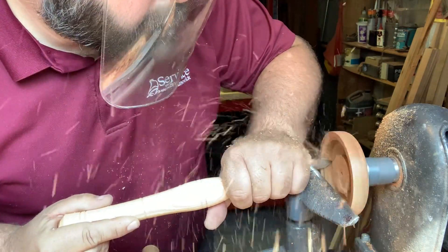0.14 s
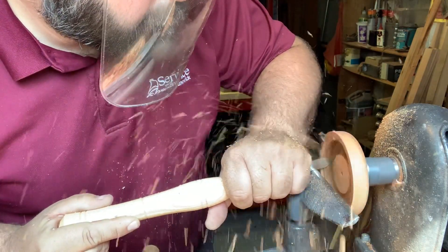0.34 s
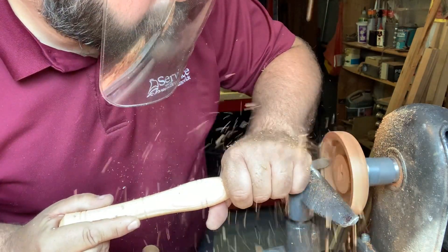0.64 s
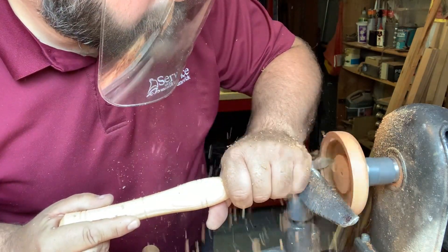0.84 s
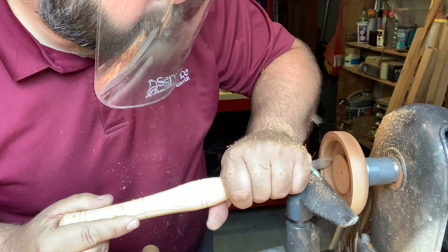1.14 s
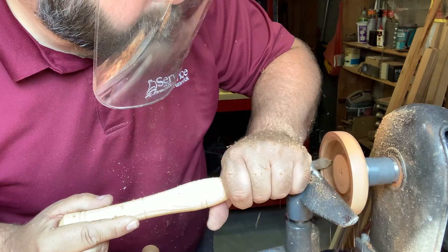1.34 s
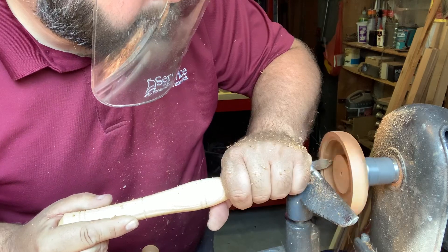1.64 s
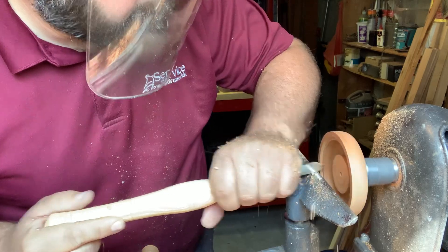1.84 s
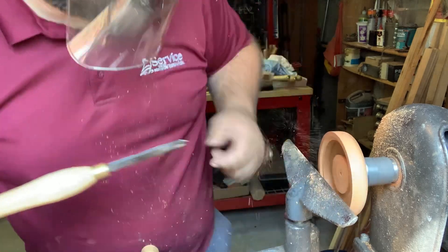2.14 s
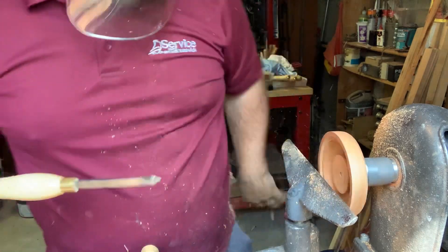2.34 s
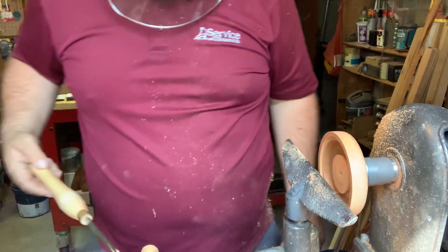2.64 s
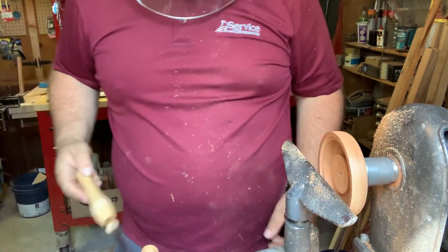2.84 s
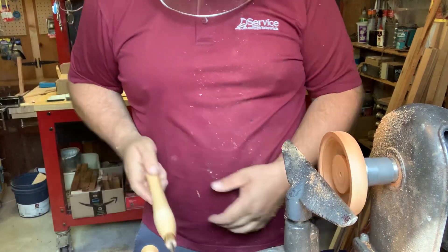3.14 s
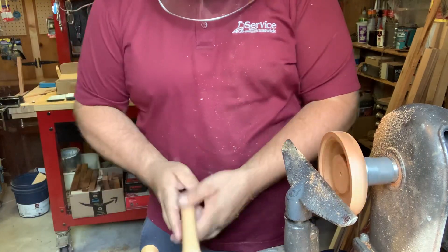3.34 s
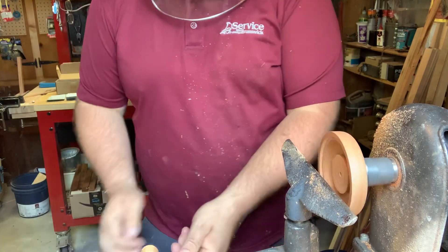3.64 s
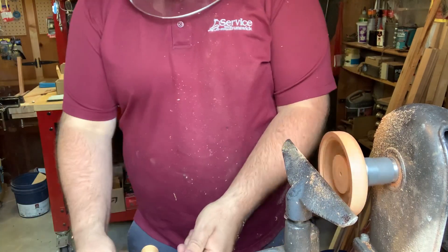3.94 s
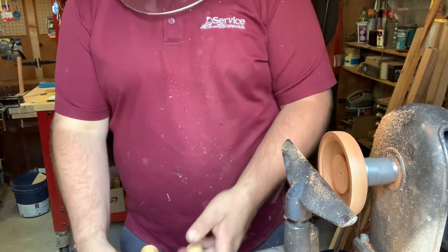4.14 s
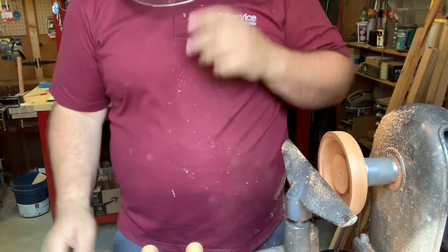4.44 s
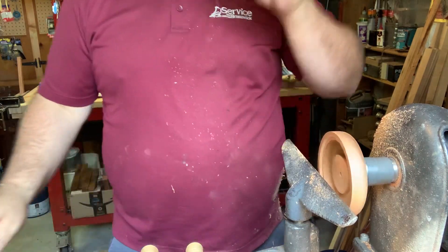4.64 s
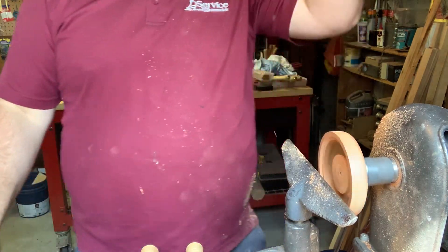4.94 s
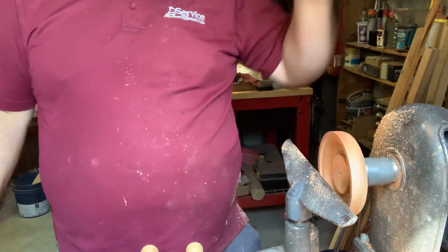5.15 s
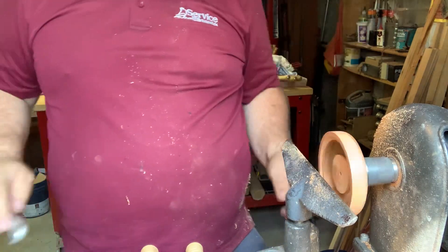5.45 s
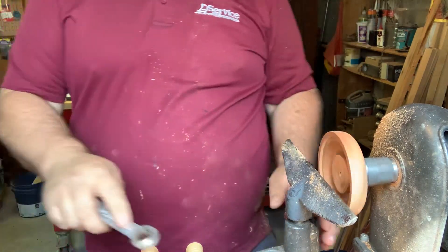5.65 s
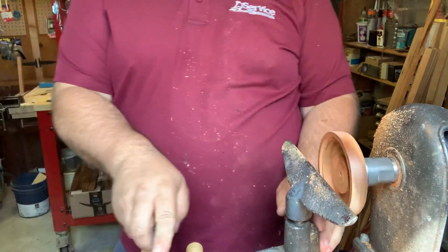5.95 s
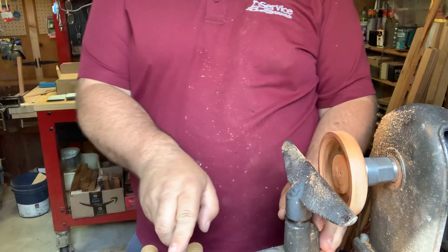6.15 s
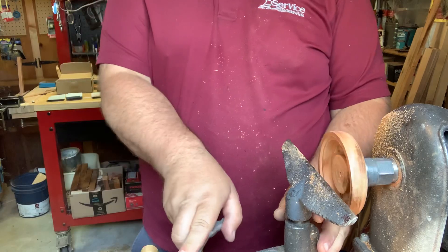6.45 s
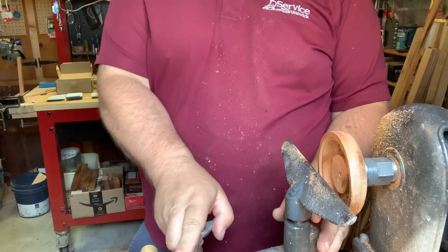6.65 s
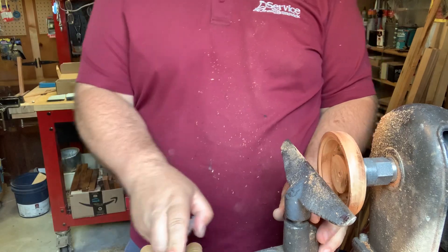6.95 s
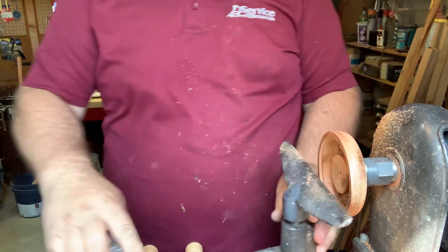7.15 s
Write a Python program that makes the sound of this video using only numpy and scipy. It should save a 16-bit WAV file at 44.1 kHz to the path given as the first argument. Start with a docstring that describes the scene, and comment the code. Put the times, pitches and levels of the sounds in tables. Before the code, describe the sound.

Close stereo pickup of a wood lathe in a small cluttered room. Loud scraping, crackling chips and a high whine pulse quickly with the rotation, then break into a short sagging squeal and chirps. The cut lightens and stops before two seconds. Steady motor hum and airy fan roar continue, slightly growing, broken by quiet handling ticks, a ringing double clink of steel and a low thud.

```python
"""Wood lathe in a small workshop

Motor harmonics hum over shaped noise: housing rumble, fan roar, air hiss and thin headstock whines.
A gouge cuts the spinning blank: snapping fibres scrape twice a turn and tear, friction sustains whining
tones and squeals; the cut eases off and the gouge is lifted away.
Short damped noises tick; later steel tools, as decaying modes, clink as they are put down and picked up."""
import sys
import numpy as np
from scipy import signal
from scipy.fft import rfft, irfft
from scipy.io import wavfile
from scipy.ndimage import uniform_filter1d

SR = 44100
rng = np.random.default_rng(int(sys.argv[2]) if len(sys.argv) > 2 else 0)


def transcribe(signal):
    """Save signal, clipped to [-1, 1], as a 16-bit WAV file at the path in sys.argv[1]."""
    frames = np.atleast_2d(signal).T
    limited = np.clip(frames, -1, 1)
    pcm = np.round(limited * 32767).astype(np.int16)
    wavfile.write(sys.argv[1], SR, pcm)


N = 321916
T, HZ = np.arange(N) / SR, np.fft.rfftfreq(N, 1 / SR)
MOTOR_HZ, SPINDLE_HZ = 353.6, 22.1
SIDE = np.array([[.5], [-.5]])  # left, right share of a left-right difference


def amp(db):
    """Amplitude ratio of a level in dB."""
    return 10 ** (np.asarray(db) / 20)


def unit_rms(x):
    """Scales to rms 1."""
    return x / np.sqrt(np.mean(x ** 2) + 1e-20)


def spectrum_curve(points, hz=HZ):
    """Joins (Hz, value) points by straight lines over log frequency."""
    point_hz, value = np.transpose(points)
    return np.interp(np.log(hz + 1), np.log(point_hz + 1), value)


def time_curve(rows):
    """Joins (s, value) points by straight lines."""
    return np.interp(T, *np.transpose(rows))


def bump(s, half_s):
    """Smooth rise and fall of height 1 around a moment; 1/e at half_s."""
    return np.exp(-((T - s) / half_s) ** 2)


def resonance_db(modes):
    """dB curve of a set of resonances."""
    return sum(db / (1 + (2 * (HZ - hz) / width) ** 2) for hz, width, db in modes)


def colour(x, db):
    """Filters by a dB curve, without phase shift."""
    return irfft(rfft(x) * amp(db), N)


def unit_band(x, band_hz):
    """Scales a stereo pair so that its middle has rms 1 within a band."""
    low_hz, high_hz = band_hz
    middle = rfft(x.mean(0)) * ((HZ > low_hz) & (HZ < high_hz))
    return x / np.std(irfft(middle, N))


def drift(rate_hz):
    """Slow chance of rms 1, low-passed near rate_hz."""
    noise = rfft(rng.standard_normal(N))
    return unit_rms(irfft(noise / (1 + (HZ / rate_hz) ** 4), N))


def add(mix, s, sound):
    """Adds a sound at a moment, in place."""
    part = mix[round(s * SR):][:len(sound)]
    part += sound[:len(part)]


# decay of the room's reflections: hz, t60_s
ROOM_T60 = [(200, 0.2), (2000, 0.34), (6000, 0.18), (13000, 0.019)]
PORT_LAG_S = 0.00016  # the work is nearer to the left port


def workshop(x, wet_db, lag_s=PORT_LAG_S):
    """Direct sound at two ports plus dense reflections from the machine, shelves and walls."""
    size = SR // 2
    taps = rng.choice([-1., 1.], (2, size)) * (rng.random((2, size)) < .08)
    hz, t, z = signal.stft(taps, SR, nperseg=256)
    decay = amp(-60 * t / spectrum_curve(ROOM_T60, hz)[:, None])
    early = 1 + 2.9 * np.exp(-t / 0.0074)
    tail = signal.istft(z * decay * early * (t > 0), SR, nperseg=256)[1]
    tail /= np.linalg.norm(tail[0])
    wet = signal.fftconvolve(x[None], tail, axes=1)[:, :N]
    late = irfft(rfft(x) * np.exp(-2j * np.pi * HZ * lag_s), N)
    return np.array([x, late]) + amp(wet_db) * wet


def tone(hz, db, pan_db, lead, wander, wander_hz, shiver_db):
    """Friction sustains a mode as a tone whose phase and swing wander."""
    phase = 2 * np.pi * hz * T + wander * drift(wander_hz)
    level_db = db + shiver_db * drift(70) + SIDE * pan_db
    return amp(level_db) * np.sin(phase + SIDE * lead)


def singing(modes, wander_hz):
    """A set of sustained modes whose middle has rms 1."""
    out = sum(tone(*mode, wander_hz, shiver_db=5.0) for mode in modes)
    return out / np.std(out.mean(0))


def struck(modes, t):
    """Free ring of a set of modes after one blow."""
    return sum(amp(db - 60 * t / t60) * np.sin(2 * np.pi * (hz * t + rng.random())) for hz, db, t60 in modes)


def turn_swing(at):
    """Swings between -1 and 1 once a turn, highest at the given point of the turn (0-1)."""
    return np.cos(2 * np.pi * (SPINDLE_HZ * T - at))


# left-right likeness of machine noise: hz, likeness (clipped to -1..1)
LIKENESS_CURVE = [(60, 3.5), (140, 1.5), (300, 0.29), (600, 0.5), (1100, 0.05), (2500, 0.08), (6000, 0.1),
                  (12000, -3.5)]
# lead of the left port: hz, lead_rad
LEAD_CURVE = [(60, 0.13), (200, -0.11), (400, 0.91), (700, 0.83), (1030, 0.29), (1500, 2.14), (3300, 0.47),
              (12000, -1.55)]
# left-right level difference: hz, left_right_db
BALANCE_CURVE = [(60, -7), (110, -3), (200, -4.5), (370, -5), (690, -1), (1260, -3), (2320, 1), (4270, -1),
                 (7860, -3.5), (14400, 3)]


def machine_noise(db):
    """Noise of the given spectrum, as it reaches the two ports from the headstock."""
    a, b = rfft(rng.standard_normal((2, N)))
    same = np.clip(spectrum_curve(LIKENESS_CURVE), -1, 1)
    side = amp(spectrum_curve(BALANCE_CURVE) / 2)
    right = (same * a + np.sqrt(1 - same ** 2) * b) * np.exp(-1j * spectrum_curve(LEAD_CURVE))
    return irfft(np.array([a * side, right / side]) * amp(db), N)


EDDY_DB, EDDY_HZ, EDDY_S = 1.1, 260, 0.13  # rms depth, width, length of an eddy


def churning(x):
    """Eddies in the fan's air lift and lower small patches of its noise."""
    hz, t, z = signal.stft(x, SR, nperseg=1024)
    patches = uniform_filter1d(rng.standard_normal(z.shape[1:]), round(EDDY_HZ / hz[1]), axis=0)
    patches = unit_rms(uniform_filter1d(patches, round(EDDY_S / t[1]), axis=1))
    return signal.istft(z * amp(EDDY_DB * patches), SR, nperseg=1024)[1][:, :N]


# noise spectra of rumble, its hollow middle, fan roar, fan cowl, air hiss, fine treble: hz, db_per_hz
RUMBLE_SPECTRUM = [(20, -53), (33, -33), (48, -20.5), (78, -13), (120, -7.5), (200, -9), (260, -8.5),
                   (315, -16), (400, -6), (500, -17), (700, -18), (900, -25.5), (1500, -79.5)]
HOLLOW_SPECTRUM = [(200, -45), (380, -31), (470, -6.5), (540, 2), (620, -0.5), (760, 1.5), (900, -14.5),
                   (1200, -53), (3000, -100)]
ROAR_SPECTRUM = [(300, -17), (600, -6.5), (900, -3.5), (1050, 0.5), (1300, -4), (1550, -5), (1750, -9.5),
                 (2100, -13.5), (3000, -22), (5000, -65)]
COWL_SPECTRUM = [(700, -38.5), (900, -12.5), (960, 0.5), (1010, -5.5), (1065, 0.5), (1130, -6),
                 (1250, -3.5), (1450, -26), (2000, -56.5), (4000, -100)]
AIR_SPECTRUM = [(800, -14.5), (2000, 3.5), (2700, 4), (3200, 6.5), (3600, 0.5), (4100, 1), (5500, -4.5),
                (6800, -3), (7600, -10), (9000, -37.5), (14500, -49.5)]
TREBLE_SPECTRUM = [(5000, -32.5), (8000, -10.5), (10700, 6.5), (12200, 0), (13200, -12.5), (14500, -15)]
# resonances of the housing: hz, width_hz, lift_db
HOUSING_MODES = [(78, 12, 4), (107.6, 4.3, 6), (154.4, 14, 13), (215.8, 30, 9), (412.6, 11, 3.5),
                 (542.4, 20, 4)]
# depth of the ripple of evenly spaced standing waves: hz, depth_db
STANDING_RIPPLE = [(300, 0.55), (450, 1.8), (600, 7.1), (850, 5.4), (1050, 3.1), (1500, 3.9), (2500, 1.4)]
# thin whines of the headstock: hz, relative_db, left_right_db, left_lead_rad, phase_wander_rad
HEADSTOCK_WHINES = [(1162, -0.5, 1, 0.5, 1.5), (1430, 0, 4, 0.43, 1.2), (1640, -4.5, 3, 1.7, 1.3),
                    (1685, 7, 0, 1.8, 1.5), (1826, 1, 2, 1.7, 1), (2945, -7.5, 8, 0.5, 4),
                    (3280, -6.5, 6.5, 0.3, 4.3)]
# level of the hollow middle of the rumble: time_s, level_db
HOLLOW_LEVEL = [(0, -43), (1.9, -42), (3.2, -44.5), (4.7, -49), (5.1, -40), (7.3, -39.5)]
# level of the fine treble hiss: time_s, level_db
TREBLE_LEVEL = [(0, -75), (4.1, -74), (4.8, -78), (5.5, -88), (7.3, -89)]
# how openly the fan is heard past the moving turner: time_s, openness_db
FAN_OPENNESS = [(0, 3.5), (1.7, -0.5), (2.6, 1), (3.4, 2.5), (3.75, 4), (4.1, 6), (4.3, 2), (5.0, 1.5),
                (5.6, -2.5), (6.1, 2), (7.3, 3.5)]
# brief dips and swells of hum and rumble: time_s, half_length_s, hum_db, rumble_db
MACHINE_SURGES = [(1.102, 0.32, -2.5, -2), (6.64, 0.41, -2.5, 2)]
STANDING_HZ = 67.75  # spacing of the standing waves
RUMBLE_START_DB, RUMBLE_GROWTH_DB_PER_S, RUMBLE_WAVER_DB = -30, 0.5131, 0.6
ROAR_DB, ROAR_GROWTH_DB_PER_S = -44.5, 0.27
# level at openness 0, dB gained per dB of openness
COWL_DB, COWL_PER_OPEN = -45.5, 1.42
AIR_DB, AIR_PER_OPEN = -58.5, 0.22
HEADSTOCK_DB = -51


def machine():
    """Housing rumble, fan roar that throbs with the spindle and rings its cowl, air hiss and thin whines."""
    open_db = time_curve(FAN_OPENNESS)
    surge_db = sum(db * bump(s, half_s) for s, half_s, _, db in MACHINE_SURGES)
    rumble_gain = amp(RUMBLE_START_DB + RUMBLE_GROWTH_DB_PER_S * T + surge_db + RUMBLE_WAVER_DB * drift(35))
    roar_gain = amp(ROAR_DB + ROAR_GROWTH_DB_PER_S * T)
    cowl_gain = amp(COWL_DB + COWL_PER_OPEN * open_db)
    air_gain = amp(AIR_DB + AIR_PER_OPEN * open_db)
    throb = amp(0.94 * np.sin(2 * np.pi * SPINDLE_HZ * T) + 1.3 * drift(15))

    ripple_db = spectrum_curve(STANDING_RIPPLE) * np.cos(2 * np.pi * HZ / STANDING_HZ)
    housing_db = resonance_db(HOUSING_MODES) + ripple_db
    rumble = machine_noise(spectrum_curve(RUMBLE_SPECTRUM) + housing_db)
    hollow = machine_noise(spectrum_curve(HOLLOW_SPECTRUM) + housing_db)
    roar = churning(machine_noise(spectrum_curve(ROAR_SPECTRUM) + housing_db))
    cowl = machine_noise(spectrum_curve(COWL_SPECTRUM))
    air = churning(machine_noise(spectrum_curve(AIR_SPECTRUM)))
    treble = machine_noise(spectrum_curve(TREBLE_SPECTRUM))
    # levels hold within the given bands (Hz)
    return (rumble_gain * unit_band(rumble, (60, 300))
            + amp(time_curve(HOLLOW_LEVEL)) * unit_band(hollow, (480, 800))
            + roar_gain * throb * unit_band(roar, (850, 1400))
            + cowl_gain * throb * unit_band(cowl, (850, 1400))
            + air_gain * unit_band(air, (3500, 7000))
            + amp(time_curve(TREBLE_LEVEL)) * unit_band(treble, (9000, 15000))
            + amp(HEADSTOCK_DB) * singing(HEADSTOCK_WHINES, wander_hz=4))


# motor hum: harmonic, relative_db, left_right_db, left_lead_rad
HUM_HARMONICS = [(1, -1.5, -2.5, 0.45), (2, -15.5, -0.5, 2.5), (3, -16.5, 4.5, -0.1), (4, -34.5, -5, -0.5)]
HUM_START_DB, HUM_GROWTH_DB_PER_S, HUM_WAVER_DB = -27.5, 0.71, 1.36
# this harmonic comes out with the fan's air: dB gained per dB of openness
WHISTLE_ORDER, WHISTLE_DB, WHISTLE_PER_OPEN, WHISTLE_WAVER_DB = 3, -28.5, 1.3, 2.2


def hum():
    """Motor harmonics that waver a little in level and phase."""
    phase, out = 2 * np.pi * MOTOR_HZ * T + 0.15 * drift(11.0), np.zeros((2, N))
    surge_db = sum(db * bump(s, half_s) for s, half_s, db, _ in MACHINE_SURGES)
    motor_db = HUM_START_DB + HUM_GROWTH_DB_PER_S * T + surge_db + HUM_WAVER_DB * drift(16.0)
    whistle_db = WHISTLE_DB + WHISTLE_PER_OPEN * time_curve(FAN_OPENNESS) + WHISTLE_WAVER_DB * drift(7)
    for order, db, pan_db, lead in HUM_HARMONICS:
        level_db = db + (whistle_db if order == WHISTLE_ORDER else motor_db)
        for channel, side in enumerate((1, -1)):
            gain = amp(level_db + side * pan_db / 2 + 1.0 * drift(14))
            out[channel] += gain * np.sin(order * phase + side * lead / 2)
    return out


# ticks of chips, taps of tools and handles:
# start_s, level_db, tilt_db_per_octave, t60_s, hollow_hz, hollow_lift_db, iron_ring (0-1)
TICK_EVENTS = [(1.068, -35.5, 12, 0.08, 6100, -1, 0.2), (1.114, -33.5, 17, 0.047, 6100, -3, 0.04),
               (1.2037, -35, 15, 0.019, 6100, 3, 0.13), (1.2496, -37, 13, 0.019, 6100, 7, 0.1),
               (4.130, -39, 4, 0.035, 6300, 1, 0), (4.137, -39, 7, 0.11, 6300, 3, 0.06),
               (5.119, -51, 3, 0.058, 4200, -12, 0.1), (6.039, -37, -6, 0.055, 3120, 11, 0.14),
               (6.337, -39, -0.5, 0.067, 5250, 9, 0.73), (7.109, -28.5, -16, 0.045, 1950, 5, 0),
               (7.115, -37, -4, 0.06, 5100, 10, 0)]
# spectrum of a tick before tilt: hz, db_per_hz
TICK_SPECTRUM = [(500, -20.5), (1200, -11), (2000, 11), (5500, -1), (7500, -8.5), (12000, -20),
                 (15000, -34)]
# modes of the lathe's ironwork: hz, relative_db, t60_s
IRON_MODES = [(1660, 2, 0.14), (2180, -7.5, .11), (3460, 2, .05), (4500, -10, .09), (5640, -15, .07),
              (6330, -18.5, .07), (7000, -6, .08)]
TICK_ATTACK_S, HOLLOW_WIDTH_HZ = 0.002, 800


def ticks():
    """Short dull or bright contacts, each coloured by one damped resonance; some ring the ironwork."""
    t, out = np.arange(SR // 6) / SR, np.zeros(N)
    hz = np.fft.rfftfreq(len(t), 1 / SR)
    attack = np.minimum(t / TICK_ATTACK_S, 1)
    for s, db, tilt_db, t60, hollow_hz, lift_db, ring in TICK_EVENTS:
        tilted_db = spectrum_curve(TICK_SPECTRUM, hz) + tilt_db * np.log2((hz + 500) / 4000)
        hollow_db = lift_db / (1 + (2 * (hz - hollow_hz) / HOLLOW_WIDTH_HZ) ** 2)
        noise = irfft(rfft(rng.standard_normal(len(t))) * amp(tilted_db + hollow_db), len(t))
        contact = amp(-60 * t / t60) * unit_rms(noise)
        add(out, s, amp(db) * attack * (contact + ring * struck(IRON_MODES, t)))
    return workshop(out, wet_db=-3.0, lag_s=0)


# steel on steel: start_s, level_db, ring (0-1)
CLINK_EVENTS = [(5.763, -14, 0.63), (5.7725, -28, 0), (5.78, -19.5, 0.33)]
# modes of the steel tool: hz, relative_db, t60_s
STEEL_MODES = [(2430, -19, .1), (3040, -7, .18), (3110, -9, .16), (3430, -7, .16), (4458, -13, .14),
               (4780, -11, .08), (5030, -6, .09), (5862, -15, .14), (6530, -19, .13), (6860, -8, .13),
               (7876, -20, .12), (8172, -19, .12), (9700, -18, .11), (10080, -23, .1), (11120, -20, .1),
               (12280, -21, .09)]
# strongest mode of the steel tool: hz, relative_db, t60_s
CLANG_MODE = (4919, 2, .088)


def clinks():
    """Steel tools touch and bounce; a free blow brings out the strongest mode."""
    t, rings, cracks = np.arange(SR // 3) / SR, np.zeros(N), np.zeros(N)
    band = signal.butter(4, [1200, 6500], "band", fs=SR, output="sos")
    clang_hz, clang_db, clang_t60 = CLANG_MODE
    attack = 1 - np.exp(-t / 0.00088)
    for s, level_db, ring in CLINK_EVENTS:
        body = struck(STEEL_MODES, t)
        clang = ring * amp(clang_db - 60 * t / clang_t60) * np.sin(2 * np.pi * clang_hz * t)
        add(rings, s, amp(level_db) * (amp(-10.5) * body + clang) * attack)
        crack = signal.sosfilt(band, rng.standard_normal(len(t)))
        add(cracks, s, amp(level_db - 10.5 - 60 * t / 0.11) * crack)
    return workshop(rings, wet_db=-9, lag_s=0) + workshop(cracks, wet_db=0, lag_s=0)


# how hard the gouge is fed into the blank: time_s, feed_db
FEED_CURVE = [(0, 0), (0.4, -0.5), (0.68, 0), (0.9, -3), (1.02, -5), (1.14, -10), (1.35, -8), (1.6, -11.5)]
# the whine swells as the gouge catches its own resonance, or chokes as it slips:
# top_s, half_length_s, lift_db
WHINE_SWELLS = [(0.095, 0.083, 5.5), (0.65, 0.14, 8.5), (1.062, 0.16, 15), (1.106, 0.015, 2),
                (1.17, 0.0085, -9)]
LIFT_S, LIFT_DB_PER_S = 1.568, 124.5  # the edge leaves the wood
WHINE_LINGER_S = 0.029  # the gouge sings on a moment after the lift
# level at feed 0, dB gained per dB of feed
SCRAPE_DB, SCRAPE_PER_FEED = -35, 1
TEAR_DB, TEAR_PER_FEED = -28.5, 2.25
WHINE_LEVEL_DB, WHINE_PER_FEED = -33, 0.94
# a lighter cut skips more (dB per dB of feed given up) but still catches the high spot of the blank
SKIP_PER_FEED, SKIP_HZ, SKIP_AT_TURN = 0.32, 25.6, 0.52
# under a light touch the whine breaks up into a flutter around a steady part
BREAKUP_S, BREAKUP_RISE_S, FLUTTER_HZ, FLUTTER_HOLD = 1.15, 0.1, 34, 2.5


def cut_levels():
    """Gains of scrape, whine and tearing: all follow the feed and die as the gouge is lifted."""
    feed_db, lifted_s = time_curve(FEED_CURVE), np.clip(T - LIFT_S, 0, 1)
    release_db = -LIFT_DB_PER_S * np.maximum(lifted_s - WHINE_LINGER_S, 0)
    skip = 0.75 * turn_swing(SKIP_AT_TURN) + 0.85 * drift(SKIP_HZ)
    skip_db = -SKIP_PER_FEED * feed_db * skip
    contact_db = skip_db - LIFT_DB_PER_S * lifted_s
    swell_db = sum(db * bump(s, half_s) for s, half_s, db in WHINE_SWELLS)
    loose = np.clip((T - BREAKUP_S) / BREAKUP_RISE_S, 0, 1)
    flutter = 1 - loose + loose * unit_rms(abs(drift(FLUTTER_HZ) + FLUTTER_HOLD))
    scrape = amp(SCRAPE_DB + SCRAPE_PER_FEED * feed_db + contact_db)
    whine_db = WHINE_LEVEL_DB + WHINE_PER_FEED * feed_db + swell_db + skip_db / 2 + release_db
    tear = amp(TEAR_DB + TEAR_PER_FEED * feed_db + contact_db)
    return scrape, amp(whine_db) * flutter, tear


def grain_gate(once_db, twice_db, once_at=0.93, twice_at=0.28):
    """The edge presses harder once a turn and meets end grain twice a turn."""
    turns = SPINDLE_HZ * T
    press_db = once_db * np.cos(2 * np.pi * (turns - once_at))
    grain_db = twice_db * np.cos(2 * np.pi * (2 * turns - twice_at))
    return unit_rms(amp(press_db + grain_db))


def fibres(per_s, spread_db, rub):
    """Wood fibres snap in uneven sizes over the steady rub of the bevel."""
    sizes = amp(spread_db * np.minimum(rng.exponential(1, N), 4.5))
    snaps = (rng.random(N) < per_s / SR) * rng.choice([-1, 1], N) * sizes
    return unit_rms(unit_rms(snaps) + rub * rng.standard_normal(N))


def squeaks(per_s, low_hz, high_hz, length_s, count=24):
    """Shavings stick and slip on the steel in brief squeaks of many pitches."""
    t, out = np.arange(int(length_s * SR)) / SR, np.zeros(N)
    for hz in np.geomspace(low_hz, high_hz, count):
        starts = (rng.random(N) < per_s / count / SR) * rng.uniform(0.33, 1, N)
        out += signal.oaconvolve(starts, np.hanning(len(t)) * np.sin(2 * np.pi * hz * t))[:N]
    return unit_rms(out)


CHIPS_PER_S, CHIPS_DB = 200, -10.5


def chips(count=8):
    """Flying chips of uneven size strike the rest and face shield and ring briefly at several pitches."""
    t, out = np.arange(SR // 50) / SR, np.zeros(N)
    for hz in np.geomspace(3100, 6500, count):
        sizes = amp(4.7 * np.minimum(rng.exponential(1, N), 3))
        hits = (rng.random(N) < CHIPS_PER_S / count / SR) * sizes
        out += signal.oaconvolve(hits, amp(-60 * t / 0.0068) * np.sin(2 * np.pi * hz * t))[:N]
    return amp(CHIPS_DB) * unit_rms(workshop(out, wet_db=9))


# modes that a heavy cut sets off in bursts:
# hz, width_hz, relative_db, left_right_db, point_of_turn (0-1), burst_depth_db
STRAIN_MODES = [(1390, 200, -15.5, 0, 0.68, 11), (1587, 210, -11.5, -20, 0.06, 4),
                (3110, 140, -16, 6, 0.13, 1), (4700, 130, -16.5, -8, 0.95, 5),
                (5940, 180, -16, -9, 0.6, 14), (6920, 180, -16, -10, 0.65, 8)]


def strained():
    """As the grain turns under the edge, one mode after another flares up, never twice alike."""
    out = np.zeros((2, N))
    for hz, width, db, pan_db, at, depth_db in STRAIN_MODES:
        mode_db = -20 * np.log10(1 + (2 * (HZ - hz) / width) ** 2)
        ring = unit_rms(colour(rng.standard_normal(N), mode_db))
        burst = unit_rms(amp(depth_db * turn_swing(at) + 1.1 * drift(26)))
        out += amp(db + SIDE * pan_db) * burst * ring
    return out


# how strongly the whine pulses with the turn: time_s, share (0-1)
PULSING_SHARE = [(0, 0.45), (0.62, 0.45), (0.74, 1), (0.89, 1), (0.96, 0.3), (1.08, 0.1)]


def pulsed(at, depth_db):
    """Gain of unit mean power that flares once a turn, its depth scaled by the pulsing share."""
    depth = depth_db * time_curve(PULSING_SHARE)
    return amp(depth * turn_swing(at)) / np.sqrt(np.i0(depth * np.log(10) / 10))


# whining modes of the gouge, and the upper one:
# hz, relative_db, left_right_db, left_lead_rad, phase_wander_rad, flare_point_of_turn (0-1), full_flare_db
WHINE_MODES = [(1990, -11, 0, 1.9, 2, 0.3, 3), (2247, 5.5, 2, 2.16, 0.62, 0.25, 3),
               (2338, -6, 4, 1.9, 0.85, 0.36, 13)]
UPPER_WHINE_MODE = (3256, -1, 8, 1.2, 1.8, 0.93, 10)
# level of the upper whine: time_s, level_db
UPPER_WHINE_LEVEL = [(0, -32.5), (0.45, -34.5), (0.82, -33.5), (0.95, -39), (1.1, -66), (1.7, -75),
                     (1.8, -120)]
WHINE_WANDER_HZ = 24


def whining(gain):
    """The gouge's modes flare one after another within each turn; the upper one fades as the cut eases."""
    lower = np.zeros((2, N))
    for *mode, at, depth_db in WHINE_MODES:
        lower += pulsed(at, depth_db) * tone(*mode, WHINE_WANDER_HZ, shiver_db=1.3)
    *mode, at, depth_db = UPPER_WHINE_MODE
    upper = pulsed(at, depth_db) * tone(*mode, WHINE_WANDER_HZ, shiver_db=2.5)
    return gain * lower / np.std(lower.mean(0)) + amp(time_curve(UPPER_WHINE_LEVEL)) * upper


# rough squeals as the edge runs out of the cut:
# top_s, level_db, rise_db_per_s, fall_db_per_s, top_hz, sag_hz_per_s, smear_hz, turn_pulse_db
SQUEAL_EVENTS = [(0.94, -18, 72, 69, 2300, 60.4, 21.5, 7.5), (0.985, -20.5, 83, 107, 2097, 1300, 75, -7),
                 (1.025, -31.5, 78, 64, 1780, 249.4, 110, 3)]
SQUEAL_AT_TURN, SQUEAL_BEND_HZ = 0.36, 30  # the pitch lifts where the edge presses hardest


def squeal():
    """Stick and slip on the edge: smeared, sagging tones with a weak octave that pulse with the turn."""
    voice, swing = np.zeros(N), turn_swing(SQUEAL_AT_TURN)
    for s, db, rise, fall, top_hz, sag, smear_hz, pulse_db in SQUEAL_EVENTS:
        sagging_hz = top_hz - sag * np.clip(T - s, -.15, .25)
        hz = sagging_hz + SQUEAL_BEND_HZ * swing + smear_hz * drift(171)
        phase = 2 * np.pi * np.cumsum(hz) / SR
        envelope = amp(db + np.minimum(rise * (T - s), fall * (s - T)))
        pulse = unit_rms(amp(pulse_db * swing + 3.4 * drift(200)))
        voice += envelope * pulse * (np.sin(phase) + amp(-27) * np.sin(2 * phase))
    # the gouge gives way poorly just above its lower whining modes
    return workshop(colour(voice, resonance_db([(2720, 200, -5)])), wet_db=-14.0)


# the last shavings chirp on the steel: start_s, pitch_hz, level_db
CHIRP_EVENTS = [(0.991, 4040, -28), (1.014, 3880, -34), (1.041, 4640, -35), (1.086, 4750, -39)]
CHIRP_S, CHIRP_WOBBLE_HZ = 0.011, 110


def chirps():
    """Brief wobbling squeaks of the last shavings."""
    out, window = np.zeros(N), np.hanning(int(CHIRP_S * SR))
    for s, hz, db in CHIRP_EVENTS:
        pitch_hz = hz + CHIRP_WOBBLE_HZ * drift(200)[:len(window)]
        add(out, s, amp(db) * window * np.sin(2 * np.pi * np.cumsum(pitch_hz) / SR))
    return workshop(out, wet_db=-3, lag_s=0)


# noise spectra of scraping and tearing: hz, db_per_hz
SCRAPE_SPECTRUM = [(1000, -1.5), (2000, 9.5), (2700, -9), (3200, -4), (4000, 2), (4750, 3.5), (5450, -5.5),
                   (6150, -1), (7100, 2.5), (8000, -13.5), (9900, 1), (12300, -11.5), (13000, -12),
                   (14500, -22)]
TEAR_SPECTRUM = [(200, -11), (500, -2), (900, -4.5), (1200, -18), (1650, -4), (1880, -24), (2200, 9.5),
                 (2450, 3.5), (2720, -10.5), (2970, 6.5), (3220, 3.5), (3340, -1), (3600, -4.5),
                 (7000, -40)]
# resonances of gouge, rest and blank: hz, width_hz, lift_db
GOUGE_MODES = [(930, 45, 8), (1207, 250, 10.5), (1690, 71, 3.5), (1950, 89, -15), (3840, 130, 5),
               (5360, 130, 8), (6100, 310, 10.5), (7020, 77, -15)]


def cutting():
    """Snapping fibres scrape, tear and set the gouge whining; it squeals as the cut runs out."""
    scrape_gain, whine_gain, tear_gain = cut_levels()
    clumps = amp(0.8 * drift(45))
    gate = unit_rms(clumps * grain_gate(once_db=2.25, twice_db=3.0))
    gouge_db, top_hz = resonance_db(GOUGE_MODES), (3500, 7500)

    snaps = workshop(gate * fibres(per_s=2600, spread_db=3.6, rub=.35), wet_db=-3)
    fizz = unit_band(colour(snaps, spectrum_curve(SCRAPE_SPECTRUM) + gouge_db), top_hz)
    slips = gate * squeaks(per_s=420, low_hz=3700, high_hz=7000, length_s=.006)
    squeak = amp(-8) * unit_band(workshop(slips, wet_db=-3), top_hz)
    rips = workshop(gate * fibres(per_s=1400, spread_db=1.5, rub=0.39), wet_db=0)
    tear = unit_rms(colour(rips, spectrum_curve(TEAR_SPECTRUM) + gouge_db))
    return (scrape_gain * (fizz + squeak + chips())
            + tear_gain * (tear + strained())
            + whining(whine_gain) + squeal() + chirps())


def scene():
    """Machine, hum, contacts slightly to the right, and the cut."""
    contacts = (clinks() + ticks()) * amp([[-.8], [.8]])
    return machine() + hum() + contacts + cutting()


EDGE_HZ = 14900


def record(dry):
    """The microphone drops the deepest bass and has a notch in the treble; then the band limit."""
    bass_db = -10 * np.log10(1 + (38 / (HZ + 1)) ** 8)
    notch_db = -16 * np.exp(-((HZ - 8600) / 600) ** 2)
    notched = colour(dry, bass_db + notch_db)
    band_limit = signal.firwin(511, EDGE_HZ, window=("kaiser", 9), fs=SR)
    return signal.oaconvolve(notched, band_limit[None], "same")


dry = scene()
out = record(dry)
transcribe(out)
```